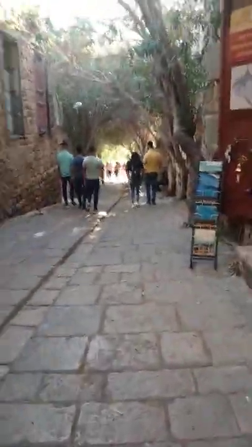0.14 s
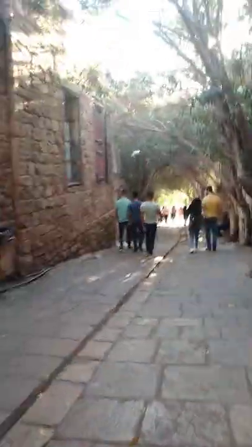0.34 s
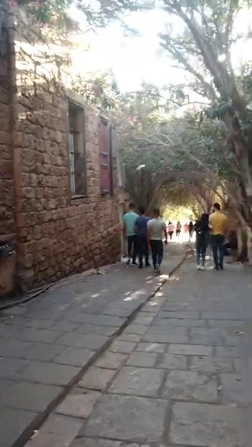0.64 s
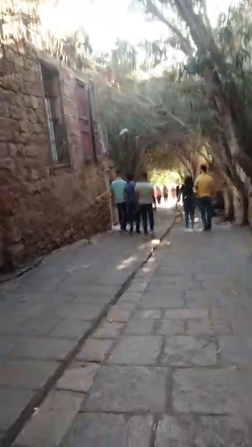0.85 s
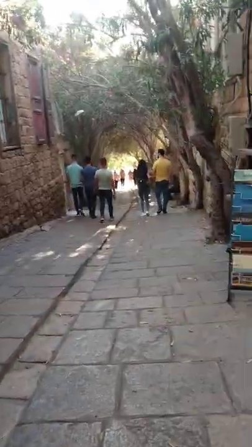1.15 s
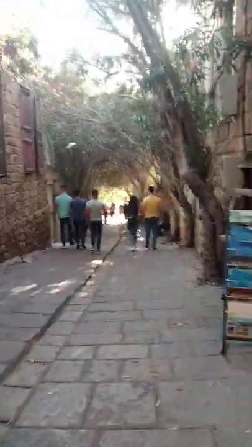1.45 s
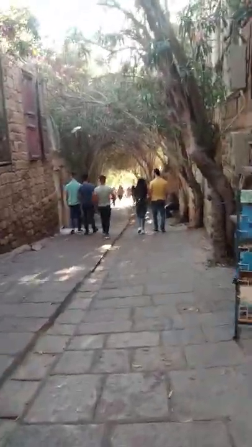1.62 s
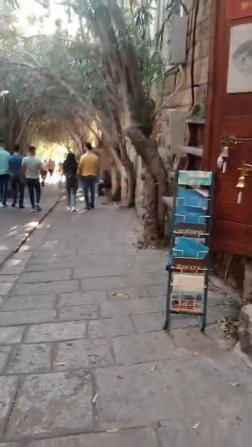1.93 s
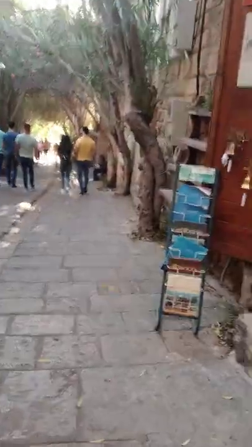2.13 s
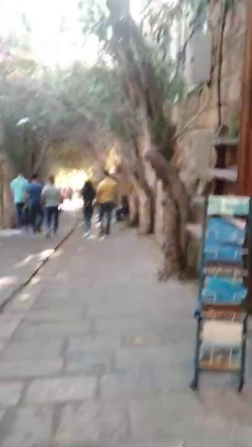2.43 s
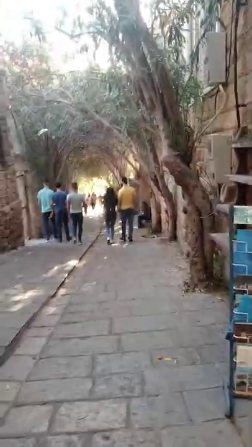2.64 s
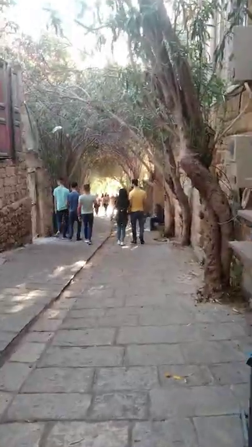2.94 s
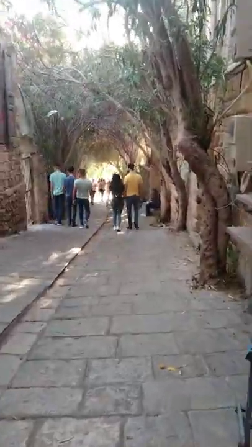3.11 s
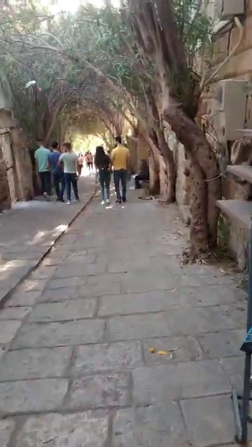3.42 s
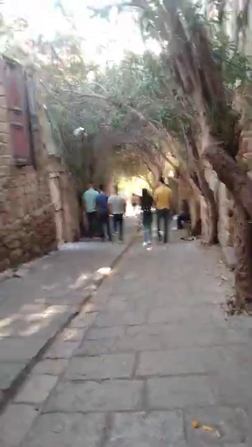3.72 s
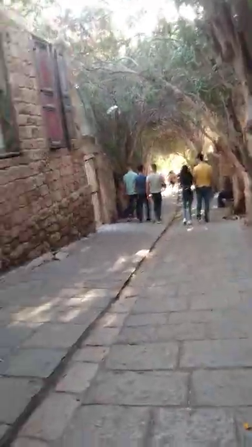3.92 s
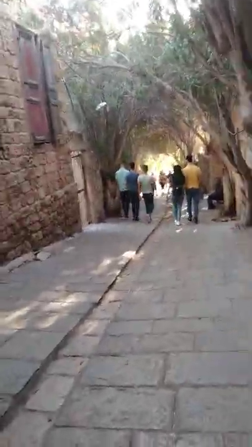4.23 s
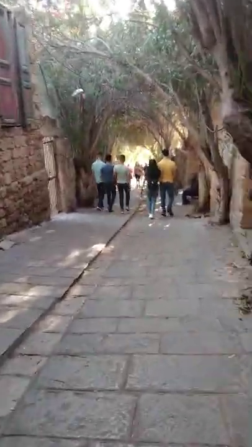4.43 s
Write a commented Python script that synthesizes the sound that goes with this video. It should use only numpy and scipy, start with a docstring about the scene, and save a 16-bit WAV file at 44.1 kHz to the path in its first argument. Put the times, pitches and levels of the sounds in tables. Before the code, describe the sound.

Unhurried hollow heel clicks, some followed by a brighter sole slap, cross stone slabs, with a short gritty scrape near the end.

```python
"""High heels on stone paving in a narrow walled lane, over a faint town murmur and a thin hiss high up.
From the start, brief scuffs, rustles, thin bands and ticks (short bands of noise) fall around the steps.
Then each step is a hollow heel knock, often followed by a brighter slap of the sole: clicks ring the shoe,
and the walls throw back early echoes and a short tail. Near the end a sole is dragged over grit (coloured
noise), and one last step follows."""
import sys
import numpy as np
from scipy import signal
from scipy.io import wavfile

SR = 44100
rng = np.random.default_rng(int(sys.argv[2]) if len(sys.argv) > 2 else 0)


def wav_out(sig):
    """Save sig, one row per channel (or a flat mono array), as 16-bit PCM at SR to the path in sys.argv[1]."""
    wavfile.write(sys.argv[1], SR, np.round(np.clip(np.atleast_2d(sig).T, -1, 1) * 32767).astype(np.int16))


N = 201253  # length in samples
TAIL_T60_S = 0.3  # time for the lane's tail to fall by 60 dB


def from_db(db):
    """Turns decibels into a gain."""
    return 10 ** (np.asarray(db) / 20)


def rms_one(x):
    """Scales a sound to an average (rms) strength of 1."""
    return x / np.sqrt(np.mean(x ** 2) + 1e-20)


def level(rows):
    """Draws a gain curve through (time_s, level_db) rows, all but silent outside them."""
    time_s, level_db = np.transpose(rows)
    return from_db(np.interp(np.arange(N) / SR, time_s, level_db, left=-200, right=-200))


def drift(rate_hz):
    """Wanders slowly at random, with rms 1: noise smoothed twice."""
    pole = np.exp(-2 * np.pi * rate_hz / SR)
    noise = rng.standard_normal(N + SR)
    smooth = signal.lfilter([1], [1, -2 * pole, pole * pole], noise)
    return rms_one(smooth[SR:])  # the first second lets the filter settle


def band(x, hz, width_hz, order=4):
    """Keeps one band of pitches; a click sent through it rings briefly."""
    edges = np.clip([hz - width_hz / 2, hz + width_hz / 2], 10, .49 * SR)
    return signal.sosfilt(signal.butter(order, edges, "band", fs=SR, output="sos"), x)


def coloured(spectrum, patchy_db, rate_hz):
    """Adds up 24 narrow bands of noise, each with its own level and flicker; rms 1."""
    hz, level_db = np.transpose(spectrum)
    centres = np.geomspace(hz[1], hz[-1], 24)
    step = centres[1] / centres[0] - 1
    white = rng.standard_normal((2, N))  # neighbouring bands use different noises
    out = np.zeros(N)
    for k, centre in enumerate(centres):
        centre_db = np.interp(np.log(centre), np.log(hz), level_db)
        strip = band(white[k % 2], centre, step * centre, order=2)
        out += strip * from_db(centre_db + patchy_db * drift(rate_hz))
    return rms_one(out)


def add(out, start_s, x):
    """Mixes x into out from the given time."""
    i = round(start_s * SR)
    out[i:i + len(x)] += x[:N - i]


def fading_band(noise, length_s, start_hz, end_hz, width_hz, swell):
    """Puts noise in one narrow, sliding band: it swells, then fades with a lingering end."""
    part = np.linspace(0, 1, int(min(length_s, .4) * SR))
    lowpass = signal.butter(4, width_hz / 2, fs=SR, output="sos")
    slow = signal.sosfilt(lowpass, noise)[:, -len(part):]
    # two slow noises on a turning cosine and sine make a band around the sliding pitch
    turn = 2 * np.pi * np.cumsum(start_hz + (end_hz - start_hz) * part) / SR
    shape = np.interp(part, [0, np.clip(swell, .02, .9), 1], [0, 1, 0]) ** 2.08
    return shape * rms_one(slow[0] * np.cos(turn) + slow[1] * np.sin(turn))


def town_murmur():
    """A faint low murmur of noise whose bands slowly waver."""
    # colour of the murmur: pitch_hz [Hz], level_db [dB per Hz, relative]
    town_colour = [(13, -28), (22, -24.5), (68, -13), (97, -7), (247, -5.5), (435, -10.5), (530, -9.5),
                   (787, -12), (890, -15), (1290, -15.5), (1530, -21.5), (4770, -37), (8000, -37),
                   (10400, -67), (17600, -120)]
    return from_db(-70.5) * coloured(town_colour, patchy_db=-1.0, rate_hz=1.2)


def high_hiss():
    """A thin hiss of treble noise that grows and shrinks."""
    # colour of the hiss: pitch_hz [Hz], level_db [dB per Hz, relative]
    hiss_colour = [(4710, -47), (8000, -22.5), (8580, -14.5), (8820, -10), (10300, -7.5), (11000, -10),
                   (12300, 3), (13300, -6), (14900, 7), (15600, -8)]
    # strength of the hiss: time_s [s], level_db [dB rms]
    hiss_level = [(0.0, -93), (0.29, -83.5), (0.41, -81.5), (0.86, -81.5), (2.39, -81), (2.5, -76.5),
                  (3.82, -80.5), (3.97, -84.5), (4.56, -83)]
    return level(hiss_level) * coloured(hiss_colour, patchy_db=.7, rate_hz=2)


def steady_thin_bands():
    """Thin steady bands of noise in the hiss, and a low hum."""
    # steady bands: pitch_hz [Hz], width_hz [Hz], level_db [dB rms]
    steady_bands = [(114.3, 15, -82.5), (9000, 50, -99), (9000, 130, -99.5), (9000, 51, -102),
                    (9740, 36, -100), (10840, 57, -96), (11460, 390, -92.5), (13900, 220, -90.5)]
    out = np.zeros(N)
    for hz, width_hz, level_db in steady_bands:
        out += from_db(level_db) * rms_one(band(rng.standard_normal(N), hz, width_hz, order=2))
    return out


def flickers():
    """Faint thin bands of noise come and go at random in the middle treble."""
    per_s, quietest_db = 25, -96
    out, draws = np.zeros(N), rng.random((200, 5))
    times = np.cumsum(-np.log(draws[:, 0])) / per_s  # random gaps
    for start_s, (_, pitch, length, loud, swell) in zip(times[times < N / SR], draws):
        hz = 2500 + 6000 * pitch
        noise = rng.standard_normal((2, SR // 8))
        flicker = fading_band(noise, 0.018 + 0.08 * length, hz, hz, 61, swell)
        add(out, start_s, from_db(quietest_db + 10 * loud) * flicker)
    return out


def grit_drag():
    """A sole dragged over grit: patchy coloured noise that rises and dies away."""
    # strength of the drag: time_s [s], level_db [dB rms]
    drag_level = [(3.81, -104), (3.828, -56.5), (3.892, -57.5), (4.022, -77), (4.05, -90)]
    # colour of the drag: pitch_hz [Hz], level_db [dB per Hz, relative]
    drag_colour = [(2120, -44), (3600, -14), (3970, 7.5), (4740, 4.5), (5920, 11), (6610, -30), (6730, -3),
                   (7150, 8), (7750, 2.5), (9030, -2.5), (12200, -5), (13500, 4), (15600, -2)]
    return level(drag_level) * coloured(drag_colour, patchy_db=1.5, rate_hz=25)


def brief_bands():
    """Short bands of noise, broad, thin or ticking, roughened by a random flutter, with a short tail."""
    # levels in these tables are those before the swell and fade
    # broad scuffs and rustles: start_s [s], length_s [s], start_hz [Hz], end_hz [Hz],
    # width_hz [Hz], level_db [dB rms]
    scuff_rows = [(0.721, 0.22, 6570, 6640, 915, -69.5), (1.424, 0.13, 13100, 13100, 3060, -72.5),
                  (1.886, 0.21, 4477, 4650, 1748, -62), (2.353, 0.21, 14000, 13900, 2480, -71),
                  (2.616, 0.19, 6060, 6630, 913, -82.5), (2.751, 0.14, 4530, 3940, 998, -68),
                  (2.817, 0.17, 3626, 3334, 703, -66), (3.075, 0.15, 5050, 4890, 930, -67),
                  (3.205, 0.33, 4800, 4970, 503, -76), (3.248, 0.2, 6290, 7080, 620, -78.5),
                  (3.316, 0.065, 13700, 14400, 3000, -70), (3.415, 0.24, 4937, 4930, 496, -74),
                  (3.548, 0.2, 13850, 14300, 1500, -72.5), (3.599, 0.083, 6160, 6250, 600, -76),
                  (3.743, 0.077, 4900, 5020, 695, -74), (3.85, 0.12, 3125, 3154, 502, -70),
                  (4.018, 0.23, 6670, 6660, 803, -77), (4.195, 0.12, 10550, 10250, 9000, -73)]
    # thin bands of noise at a fixed pitch, brief and fading: start_s [s], length_s [s],
    # pitch_hz [Hz], level_db [dB rms]
    thin_rows = [(0.0, 0.073, 2197, -68.5), (0.016, 0.073, 2790, -76), (0.233, 0.069, 4470, -71.5),
                 (0.439, 0.078, 3035, -66.5), (0.446, 0.17, 4690, -75), (0.616, 0.049, 7800, -72.5),
                 (0.753, 0.083, 3930, -71.5), (0.908, 0.1, 4130, -67.5), (0.96, 0.15, 3670, -73),
                 (1.433, 0.051, 6720, -74), (1.455, 0.045, 839, -56), (1.857, 0.11, 4910, -67),
                 (2.072, 0.2, 5000, -75.5), (2.134, 0.12, 3290, -71.5), (2.431, 0.08, 7540, -70),
                 (2.57, 0.18, 610.6, -50), (2.705, 0.054, 3060, -75.5), (2.785, 0.074, 4820, -71),
                 (3.015, 0.074, 1760, -56.5), (3.125, 0.2, 1730, -58.5), (3.225, 0.15, 2066, -62),
                 (3.366, 0.054, 2580, -70.5), (3.553, 0.061, 1530, -58), (3.792, 0.058, 1526, -51.5),
                 (3.82, 0.062, 956.5, -40.5), (3.825, 0.15, 1688, -63), (3.862, 0.13, 1005, -51),
                 (3.879, 0.12, 2030, -66), (4.089, 0.14, 4980, -72.5), (4.189, 0.089, 216, -52),
                 (4.37, 0.044, 970, -61), (4.391, 0.16, 1010, -58), (4.413, 0.098, 2664, -67.5)]
    # brief gritty ticks: start_s [s], pitch_hz [Hz], width_hz [Hz], level_db [dB rms]
    tick_rows = [(1.895, 4070, 300, -62), (2.129, 3200, 400, -59), (3.612, 3680, 5000, -70),
                 (3.745, 5270, 1190, -62.5), (4.191, 10000, 11200, -53)]
    scuff_swell, tick_swell = .12, .3  # share of the length spent rising
    thin_attack_s, tick_s = 0.0085, 0.019
    strands, strand_width_hz, strand_db = 6, 70, 2

    rows = [(*row, scuff_swell) for row in scuff_rows]
    for start_s, length_s, hz, level_db in thin_rows:
        width_hz = 39.4 + 0.03 * hz  # wider as the pitch rises
        rows.append((start_s, length_s, hz, hz, width_hz, level_db, thin_attack_s / length_s))
    for start_s, hz, width_hz, level_db in tick_rows:
        rows.append((start_s, tick_s, hz, hz, width_hz, level_db, tick_swell))
    # thin strands streak each scuff, spread over its width and starting within its first half
    for start_s, length_s, start_hz, end_hz, width_hz, level_db in scuff_rows:
        each_db = level_db + strand_db - 10 * np.log10(strands)
        for k, (late, pitch) in enumerate(rng.random((strands, 2))):
            wait = late / 2
            hz = start_hz + wait * (end_hz - start_hz) + width_hz * ((k + pitch) / strands - .5)
            rows.append((start_s + wait * length_s, (1 - wait) * length_s, hz, hz,
                         strand_width_hz, each_db, scuff_swell))

    out = np.zeros(N)
    flutter = from_db(2 * drift(51))  # 2 dB rms of roughness
    for start_s, *sound, level_db, swell in rows:
        noise = rng.standard_normal((2, SR // 2))
        rough = noise * np.roll(flutter, -round(start_s * SR))[:SR // 2]
        add(out, start_s, from_db(level_db) * fading_band(rough, *sound, swell))

    t = np.arange(SR // 3) / SR
    tail = rng.standard_normal(len(t)) * from_db(-37.5 - 60 * t / TAIL_T60_S)
    tail[0] = 1  # the direct sound
    return signal.fftconvolve(out, tail)[:N]


def shoe_blow(hz, low_db, second_db, middle_db, upper_db, bright_hz, fall_db):
    """One click rings the knock and the shoe's other modes; returns the bare knock and the whole blow."""
    # what a shoe rings with beside the knock, low to high: pitch_hz [Hz], width_hz [Hz]
    other_modes = [(330, 94), (1060, 190), (1430, 346), (1940, 402), (2400, 400), (3300, 820), (4800, 1740),
                   (6900, 1400), (12200, 2000)]
    # what each upper ring has of its own: level_db [dB]
    own_db = [2.3, -2, -3, -3.5, -6.5, -6.5]
    click = np.full(SR // 10, 1e-18)
    click[0] = 1
    knock = band(click, hz, 400)
    hollow = band(knock, hz, 58, order=1)  # the hollow heel rings on at the knock's pitch
    rings = [band(click, *mode) for mode in other_modes]

    # up to three tiny rebounds within 1.4 ms streak the upper rings
    chatter = np.zeros(SR // 100)
    rebounds = (rng.uniform(.2, 1, 3) * .0014 * SR).astype(int)
    chatter[rebounds] = from_db(-4.5) * rng.choice([-1, 1], 3)
    chatter[0] = 1
    upper_rings = [signal.lfilter(chatter, 1, ring) for ring in rings[3:]]

    # upper rings weaken with each octave away from the brightest pitch
    upper_hz = np.transpose(other_modes)[0, -len(own_db):]
    upper_levels = upper_db + np.array(own_db) - fall_db * np.abs(np.log2(upper_hz / bright_hz))
    modes = [knock, hollow, *rings[:3], *upper_rings]
    levels_db = [0, -10, low_db, second_db, middle_db, *upper_levels]
    blow = sum(from_db(db) * mode / np.abs(mode).max() for db, mode in zip(levels_db, modes))
    return knock, blow


def walled_lane(tail_db):
    """The lane's answer to a blow: direct sound, wall echoes and a dying scatter of reflections."""
    # echoes from near walls: delay_s [s], level_db [dB against the direct sound]
    wall_echoes = [(.0062, -12), (.0125, -25), (.027, -26.5)]
    tail_rise_s, tail_low_hz = 0.00033, 400
    t = np.arange(SR // 2) / SR
    lane = rng.standard_normal(len(t)) * from_db(tail_db - 60 * t / TAIL_T60_S)
    lane *= 1 - np.exp(-t / tail_rise_s)
    # the open sky lets lows escape
    lane = signal.lfilter([1, -1], [1, -np.exp(-2 * np.pi * tail_low_hz / SR)], lane)
    lane[0] = 1
    for delay_s, echo_db in wall_echoes:
        lane[round(delay_s * SR)] += from_db(echo_db)
    return lane


def steps():
    """Heel and sole blows: a soft first touch, then the ringing shoe answered by the lane."""
    # dull heel knocks: start_s [s], peak_db [dB, knock alone], knock_hz [Hz], then against the knock:
    # low_ring_db, middle_ring_db, upper_rings_db [dB]; tail_db [dB against the direct sound, before its low cut]
    heel_rows = [(0.232, -20, 646, -29.5, -31, -21, -30.5), (0.625, -19.5, 698, -48, -29.5, -68, -34),
                 (0.735, -24, 646, -23.5, -24.5, -22, -32.5), (1.287, -21.5, 675, -39.5, -25, -23, -33.5),
                 (1.883, -31.5, 638, -47, -35, -39, -28), (2.464, -21.5, 663, -34.5, -21.5, -61.5, -29.5),
                 (3.051, -28.5, 646, -38, -14, -24, -26.5), (3.546, -39, 477, -37, -22.5, -45, -30.5),
                 (3.644, -25.5, 613, -26.5, -48, -30.5, -26), (4.176, -29.5, 596, -51, -9.5, -46, -25.5)]
    # brighter sole slaps after the heel: the same columns, then brightest_hz [Hz],
    # fall_db [dB per octave, upper rings away from the brightest]
    sole_rows = [(0.249, -35, 635, -12.5, -40, -13, -30.5, 2700, 14.5),
                 (0.76, -28.5, 739, -28, -7, -9, -36.5, 2100, 10.5),
                 (1.299, -32.5, 595, -39, -23, -25, -30.5, 4000, 18),
                 (1.92, -27, 944, -35.5, -4.5, -6, -35.5, 3400, 9.5),
                 (2.496, -34, 670, -47, -7.5, -27, -39, 1940, 34),
                 (3.078, -38, 633, -43, -24, -0.5, -34.5, 1940, 6.5),
                 (3.671, -34, 579.8, -16.5, -27, -11.5, -34, 2400, 49),
                 (4.2, -26, 587, -42, -5.5, -12, -36.5, 2900, 16)]
    # a heel hardly wakes the upper rings: brightest Hz, fall in dB per octave;
    # the last value is the ring just above the knock, in dB against it
    blows = [(*heel, 1940, 57, -23) for heel in heel_rows]
    blows += [(*sole, -11.5) for sole in sole_rows]
    touch_early_s, touch_db, blow_late_s = 0.00792, -27.5, .0025  # both times from start_s to the crest

    out = np.zeros(N)
    for (start_s, peak_db, hz, low_db, middle_db, upper_db, tail_db,
         bright_hz, fall_db, second_db) in blows:
        knock, blow = shoe_blow(hz, low_db, second_db, middle_db, upper_db, bright_hz, fall_db)
        crest_s = np.abs(knock).argmax() / SR
        touch = from_db(peak_db + touch_db) * knock / np.abs(knock).max()
        add(out, start_s - touch_early_s - crest_s, touch)
        heard = signal.fftconvolve(blow, walled_lane(tail_db))
        add(out, start_s + blow_late_s - crest_s, -from_db(peak_db) * heard)
    return out


def scene():
    """Steps, a drag and brief bands of noise over the murmur and hiss."""
    background = town_murmur() + high_hiss() + steady_thin_bands() + flickers()
    return (background + grit_drag() + brief_bands() + steps())[None]


def record(dry):
    """Cuts the top steeply, 60 dB down from 15.9 kHz, and adds a trace of converter noise."""
    steep = signal.cheby2(24, 60, 15900, fs=SR, output="sos")
    return signal.sosfilt(steep, dry) + from_db(-105) * rng.standard_normal(dry.shape)


dry = scene()
out = record(dry)
wav_out(out)
```